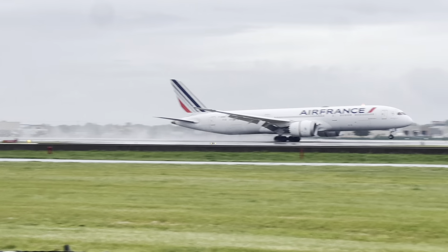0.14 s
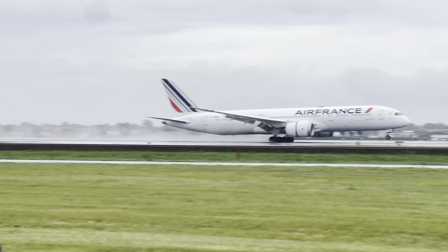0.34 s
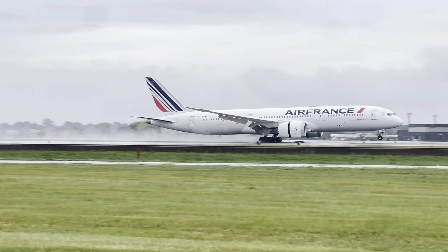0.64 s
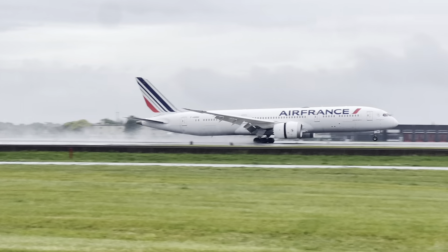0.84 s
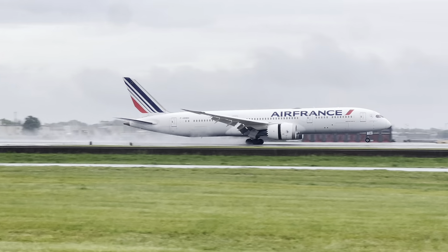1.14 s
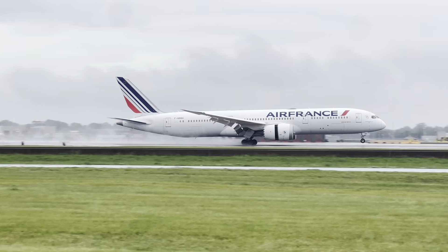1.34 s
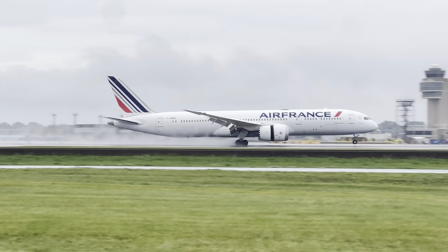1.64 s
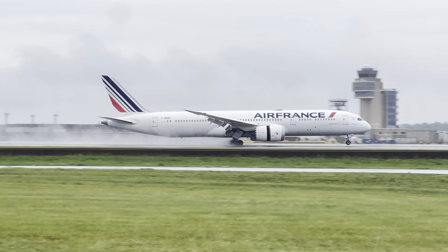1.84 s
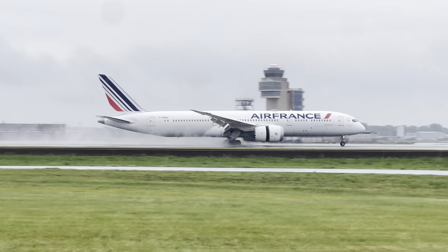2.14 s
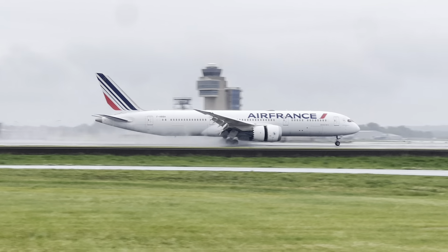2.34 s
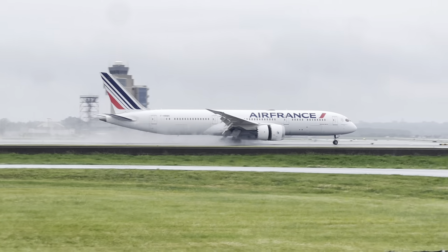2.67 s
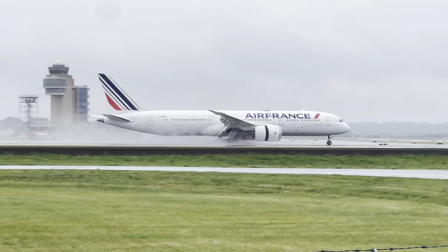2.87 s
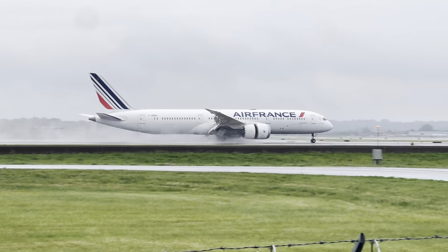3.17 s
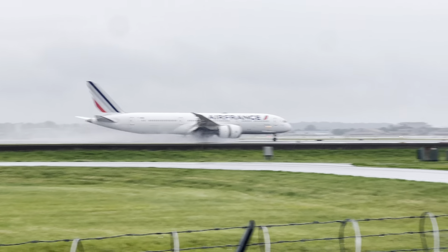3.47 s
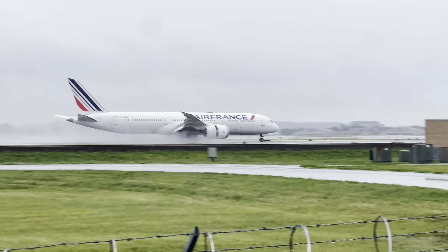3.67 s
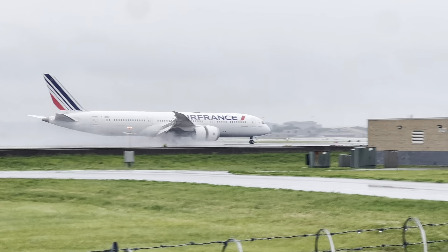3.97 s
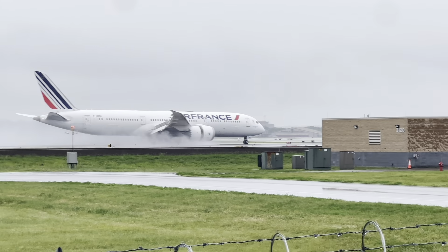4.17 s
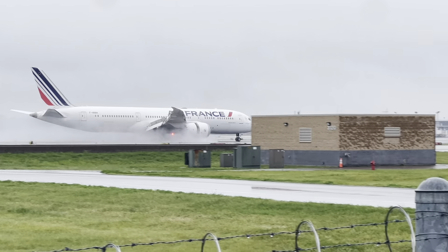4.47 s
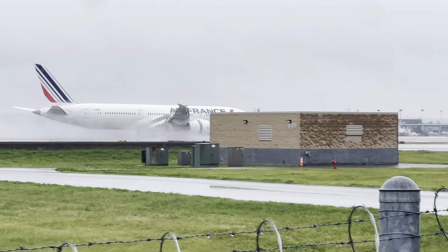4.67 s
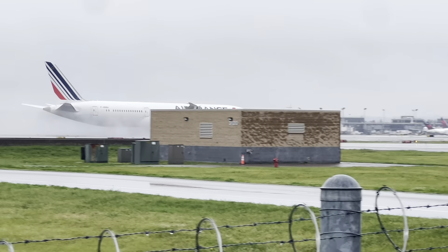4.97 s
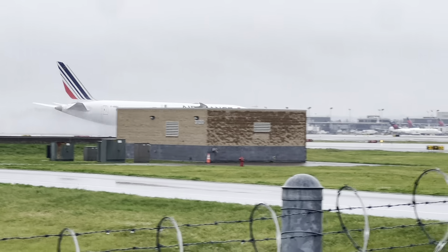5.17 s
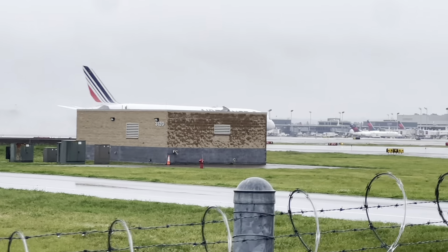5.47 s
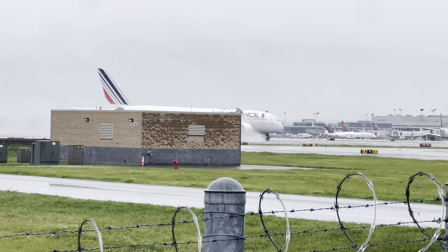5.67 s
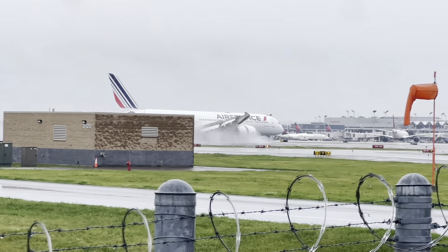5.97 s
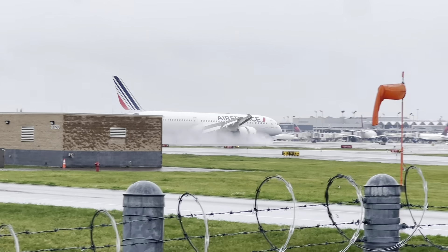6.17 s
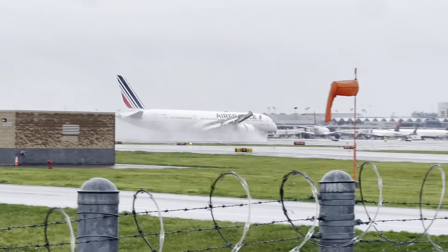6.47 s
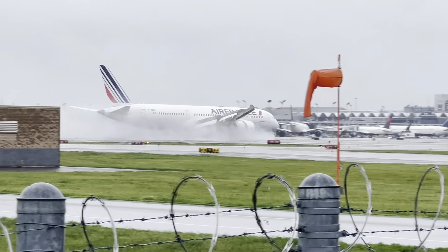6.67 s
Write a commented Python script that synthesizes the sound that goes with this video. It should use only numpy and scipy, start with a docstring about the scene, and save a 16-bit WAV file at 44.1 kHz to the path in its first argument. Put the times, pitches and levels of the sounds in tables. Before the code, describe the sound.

A large jet rolls past on a wet runway in reverse thrust, its deep rumble and gusty roar swelling to a broad hissing blast.

```python
"""A large jet rolls past on a wet runway in reverse thrust, heard from the airport fence.
From the start, shaped noise makes its rumble, its roar and a hiss of fine turbulence and spray in gusty wind.
Blurred engine whines swell and die early on, with a soft rustle and tiny ticks close by.
The blast grows as the jet comes abreast, while the echo off the grass cuts wandering dips in the sound.
A wavering fan tone comes through as the jet draws away, and last a shed briefly combs the rumble."""
import sys
import numpy as np
from scipy import signal
from scipy.io import wavfile
from scipy.ndimage import uniform_filter1d, minimum_filter1d

SR = 44100
rng = np.random.default_rng(int(sys.argv[2]) if len(sys.argv) > 2 else 0)


def pcm_store(signal):
    """Save signal as 16-bit PCM."""
    levels = np.round(np.clip(np.atleast_2d(signal), -1, 1) * 32767)
    wavfile.write(sys.argv[1], SR, levels.astype(np.int16).T)


N = 300762

FRAME, HOP = 2048, 256  # length and spacing of the noise frames, in samples
HZ = np.fft.rfftfreq(FRAME, 1 / SR)
TIMES = np.arange(N // HOP + 9) * HOP / SR  # time of each frame, in s
T = np.arange(N) / SR  # time of each sample, in s

# strength of the reversed fan air, which drives both roar and hiss: time_s, level_db
BLAST = [(0.03, -35), (0.44, -35), (0.99, -29.5), (1.76, -31), (2.13, -26.5), (2.72, -24), (2.95, -21),
         (3.3, -21.5), (3.9, -21), (4.5, -19.5), (5.0, -18.5), (5.45, -21.5), (5.95, -23.5), (6.8, -25)]
FULL_DB = -19  # the blast near full reverse thrust
# dips where direct sound and ground echo cancel: time_s, low_dip_hz, low_depth (ratio), high_dip_hz
GROUND_DIP = [(0, 385, 0.5, 1960), (0.6, 376, 1.1, 2140), (1.15, 422, 0.94, 2360), (1.8, 390, 0.96, 2320),
              (2.2, 375, 0.75, 2300), (2.85, 345, 0.45, 2170), (3.3, 366, 0.8, 2170),
              (3.85, 377, 1.8, 2060), (4.4, 374, 1, 2070), (5, 388, 1.1, 2050), (5.8, 412, 0.69, 1840),
              (6.8, 414, 1.3, 1480)]


def gain_of(db):
    """Turns decibels into a factor for the amplitude."""
    return 10 ** (np.asarray(db) / 20)


def evened(x):
    """Scales a signal to an rms of 1."""
    return x / np.sqrt(np.mean(x ** 2) + 1e-20)


def read(points):
    """Reads a spectrum table at every frequency bin, straight on a log-frequency axis."""
    hz, value = np.transpose(points)
    return np.interp(np.log(HZ + 1), np.log(hz + 1), value)


def follow(rows):
    """Reads each column of a time table at every frame."""
    s, *columns = np.transpose(rows)
    return [np.interp(TIMES, s, column)[:, None] for column in columns]


def octaves(centre_hz):
    """Gives the distance of every bin from a centre, in octaves."""
    return np.log2((HZ + 1) / centre_hz)


def bell(distance, spread):
    """A smooth hump: 1 at distance zero, about 0.37 at one spread to either side."""
    return np.exp(-(distance / spread) ** 2)


def moment(centre_s, spread_s):
    """A smooth hump over the frames: it swells and dies around one moment."""
    return bell(TIMES[:, None] - centre_s, spread_s)


def patches(seconds, width_hz):
    """Random noise smoothed over time and frequency, scaled to an rms of 1."""
    field = rng.standard_normal((len(TIMES), len(HZ)))
    for axis, steps in enumerate([seconds * SR / HOP, width_hz * FRAME / SR]):
        field = uniform_filter1d(field, max(1, round(steps)), axis, mode="wrap")
    return evened(field)


def turbulence(colour_db, level_db):
    """Stereo noise shaped frame by frame: what both sides share is mid, what differs is side."""
    # how wide the sound is: pitch_hz, side_minus_mid_db
    width_curve = [(60, -29.5), (130, -23.5), (250, -22), (400, -32.5), (630, -11), (830, -25.5),
                   (1100, -16.5), (1900, -27.5), (2700, -27.5), (3500, -35.5), (4300, -51), (6900, -54.5),
                   (7800, -14), (8600, 2.5), (11500, 5), (13000, -13.5)]
    # which side is louder: pitch_hz, left_minus_right_db
    lean_curve = [(60, -.1), (125, -.5), (300, -.8), (550, -2.2), (1000, -1.8), (1700, -.8), (2800, 0)]
    # which side is ahead in phase: pitch_hz, left_lead_radians
    lead_curve = [(60, 0), (250, -0.065), (520, -.2), (800, 0), (3000, 0)]
    a, b, c, d = rng.standard_normal((4, len(TIMES), len(HZ)))
    mid = a + 1j * b
    side = (c + 1j * d) * gain_of(read(width_curve))
    lean = gain_of(read(lean_curve) / 2) * np.exp(.5j * read(lead_curve))
    colour = gain_of(colour_db)
    colour /= np.linalg.norm(colour, axis=-1, keepdims=True)  # colour alone leaves the level unchanged
    frames = np.array([(mid + side) * lean, (mid - side) / lean]) * colour * gain_of(level_db)
    unit_rms = np.sqrt(3 * FRAME / HOP / 8)  # makes up for the overlap of the frames
    noise = signal.istft(frames.swapaxes(1, 2), nperseg=FRAME, noverlap=FRAME - HOP)[1]
    return unit_rms * noise[:, :N]


def narrow_noise(hz, width_hz):
    """A tone blurred by the moving air into a narrow band of noise around the curve hz."""
    offset_hz = np.fft.fftfreq(N, 1 / SR)
    blur_spectrum = np.fft.fft(rng.standard_normal(N)) / (1 + (2 * offset_hz / width_hz) ** 2)
    carrier = np.exp(2j * np.pi * np.cumsum(hz) / SR)
    return evened((np.fft.ifft(blur_spectrum) * carrier).real)


def air_floor():
    """A thin, steady floor of hiss."""
    # spectrum of the floor: pitch_hz, density_db_per_hz (relative)
    floor_spectrum = [(20, -4), (8000, -11.5), (11500, 25.5), (15500, 16)]
    return turbulence(read(floor_spectrum), level_db=-77.5)


def ground(low_db, high_db):
    """Echoes off the ground partly cancel the direct sound, around two wandering pitches."""
    low_hz, depth, high_hz = follow(GROUND_DIP)
    formed = np.minimum(TIMES[:, None] / 3.7, 1)  # the upper one takes 3.7 s to form
    low_dip_db = low_db * depth * bell(octaves(low_hz), 0.18)
    high_dip_db = high_db * formed * bell(octaves(high_hz), 0.25)
    return -low_dip_db - high_dip_db


def surges():
    """Brief rises and falls of the rumble in dB, each in its own part of the bass."""
    # surges of the rumble: crest_s, spread_s, centre_hz, lift_db
    surge_rows = [(0.163, 0.13, 90, 2.5), (1.12, 0.06, 100, -3), (2.1, 0.08, 59.6, 2.5),
                  (2.712, 0.052, 95, 2.5), (3.33, 0.11, 90, 2), (3.695, 0.08, 130, 4), (4.22, 0.2, 270, 3),
                  (4.642, 0.1, 105, 2.5), (6.05, 0.071, 105, 2.5), (6.358, 0.069, 136, 3),
                  (6.76, 0.067, 91, 2.5)]
    return sum(db * moment(s, spread_s) * bell(octaves(hz), 0.36) for s, spread_s, hz, db in surge_rows)


def rumble():
    """The largest eddies of the fan air make bass noise, deepest when the jet is abreast."""
    # level of the rumble before its surges and trim: time_s, level_db
    thrust_curve = [(0, -21.5), (0.55, -24), (0.97, -22), (1.08, -19.5), (2.35, -17), (3.05, -13),
                    (4.1, -15), (4.75, -13), (5.45, -15.5), (6.8, -15.5)]
    # spectrum of the rumble: pitch_hz, density_db_per_hz (relative)
    rumble_spectrum = [(20, -28), (35, -18), (48, -6), (62, 4.5), (80, -0.5), (100, -1), (150, -5.5),
                       (200, -7), (260, -10.5), (315, -13.5), (370, -22.5), (420, -18.5), (520, -47),
                       (900, -120)]
    # the deepest bass swells and sags: time_s, lift_db
    bass_curve = [(.15, 2), (.6, 4), (1.3, 5), (2.1, 1.5), (2.7, 0), (3.2, -4), (3.9, 0), (4.3, 2.5),
                  (5.0, -2), (5.4, -7), (6.15, 3.5), (6.5, -9), (6.8, -5)]
    level_db, = follow(thrust_curve)
    dip_hz = follow(GROUND_DIP)[0]
    abreast = moment(2.82, 1.19)
    tilt_db = 0.24 - 2.0 * abreast  # per octave
    # the ground echo lifts the rumble just under its dip, most when the jet is far
    shoulder_db = 3.5 * (1 - 0.6 * abreast) * bell(octaves(0.709 * dip_hz), 0.34)
    colour_db = read(rumble_spectrum) + tilt_db * octaves(110) + shoulder_db
    colour_db = colour_db + ground(low_db=7.5, high_db=1.0) + shed()
    swell_db = follow(bass_curve)[0] * bell(octaves(54), 0.32)
    noise = turbulence(colour_db, level_db + swell_db + surges() + 0.86)
    # the microphone passes little of the deepest bass
    bass_cut = signal.butter(2, 48, "high", fs=SR, output="sos")
    return signal.sosfilt(bass_cut, noise)


def gusts():
    """Gusts and lulls in the wind carry the sound better or worse; gives the lift in dB."""
    # gusts (lift above 0) and lulls (below 0): crest_s, spread_s, lift_db
    gust_rows = [(0.073, 0.035, -3.5), (0.18, 0.028, 5), (0.42, 0.09, -0.5), (0.68, 0.035, 1.5),
                 (0.794, 0.049, -2.5), (1.1, 0.045, 2.5), (1.4, 0.2, 0), (1.86, 0.08, -1.3), (2.15, .1, 3),
                 (2.56, 0.19, 3.5), (2.774, 0.041, -2), (3.27, 0.098, 4.5), (3.646, 0.3, 2.1),
                 (4.65, 0.071, 1), (5.5, 0.17, 1), (6.03, 0.07, -0.5), (6.237, 0.1, 2.5), (6.5, 0.17, 2.5)]
    return sum(db * moment(s, spread_s) for s, spread_s, db in gust_rows)


def roar():
    """Middle-sized eddies from the reversers: brighter as the blast grows, a little patchy over the field."""
    # spectrum of the roar: pitch_hz, density_db_per_hz (relative)
    roar_spectrum = [(220, -31.5), (380, -0.5), (470, -1), (600, -0.5), (690, -2), (780, -5), (940, -0.9),
                     (1140, -0.1), (1250, -1.5), (1350, -2.5), (1500, -0.5), (1820, -5), (2250, -8.5),
                     (2900, -30), (5000, -120)]
    # lift of the low part of the roar: time_s, lift_db
    low_curve = [(0, 2), (0.8, 1.5), (1.4, 1.5), (2.0, 0), (2.9, -0.5), (3.65, -1.5), (4.3, -0.8),
                 (4.9, 0.9), (5.6, -1.5), (6.8, 1.5)]
    blast_db, = follow(BLAST)
    tilt_db = 0.84 + 0.19 * (blast_db - FULL_DB)  # per octave
    colour_db = read(roar_spectrum) + tilt_db * octaves(900) + ground(low_db=9.0, high_db=4)
    # the body fills out while the exhausts turn toward the fence
    body_db = 2.1 * moment(4.7, 0.62) * bell(octaves(1040), 0.22)
    low_db = follow(low_curve)[0] * bell(octaves(560), 0.6)
    patchy_db = 0.71 * patches(seconds=0.17, width_hz=200) + 0.6 * patches(seconds=.08, width_hz=3900)
    # the wind moves the roar less than the hiss
    return turbulence(colour_db, blast_db + 0.4 * gusts() + body_db + low_db + patchy_db)


def hiss():
    """Fine turbulence and spray: it grows faster than the blast, brightens in gusts, and flickers."""
    # spectrum of the hiss: pitch_hz, density_db_per_hz (relative)
    hiss_spectrum = [(1210, -30.5), (2050, -3), (2270, -3.5), (2550, 3), (2800, 0.3), (3250, 0.5),
                     (4500, -8), (5100, -8), (5800, -14), (7000, -19), (7600, -21.5), (8530, -29.5),
                     (9200, -42.5), (12000, -95), (20200, -120)]
    blast_db, = follow(BLAST)
    carried_db = 1.32 * (blast_db - FULL_DB) + gusts()
    tilt_db = 0.034 * carried_db + .55  # per octave
    # from 3.5 s on the air takes more and more treble as the jet rolls away
    absorbed_db = 0.89 * np.maximum(TIMES[:, None] - 3.5, 0) * (HZ / 8000) ** 2
    colour_db = read(hiss_spectrum) + tilt_db * octaves(3200) - absorbed_db
    colour_db = colour_db + ground(low_db=-1, high_db=2.5)
    # the ground echo ripples the treble too, with a slight dip at each multiple of the high one
    ripple = np.cos(2 * np.pi * HZ / follow(GROUND_DIP)[2])
    colour_db -= 0.1 * ripple * np.clip(octaves(2500), 0, 1)
    colour_db += 0.85 * patches(seconds=0.23, width_hz=1400)
    flicker_db = 0.67 * patches(seconds=.04, width_hz=6400)
    return turbulence(colour_db, FULL_DB - 5 + carried_db + flicker_db)


def whines():
    """Blurred engine whines that swell, glide in pitch and vanish before the jet comes abreast."""
    # whines while the intakes still face this way, with the level at the crest of each:
    # start_s, end_s, start_hz, end_hz, width_hz, level_db
    whine_rows = [(-0.62, 1.343, 310, 268, 80, -31.5), (0.089, 1.6, 540, 525, 180, -35.5),
                  (0.04, 0.287, 1300, 1380, 180, -39), (-.3, 0.27, 5200, 8900, 40, -74),
                  (0.79, 1.6, 6250, 6050, 350, -71)]
    out = np.zeros(N)
    for start, end, from_hz, to_hz, width_hz, db in whine_rows:
        progress = np.clip((T - start) / (end - start), 0, 1)
        hz = from_hz + (to_hz - from_hz) * progress
        out += gain_of(db) * np.sin(np.pi * progress) * narrow_noise(hz, width_hz)
    return out


def rustle():
    """One brief, soft brush of treble noise close to the microphone, which flutters as it passes."""
    # spectrum of the rustle: pitch_hz, density_db_per_hz (relative)
    rustle_spectrum = [(2500, -16), (5000, 0), (7500, 1), (8800, -1), (10500, -31), (15500, -25)]
    flutter_db = 1.5 * patches(seconds=.03, width_hz=6000)
    return bell(T - 0.25, .11) * turbulence(read(rustle_spectrum), -58 + flutter_db)


def ticks():
    """Tiny treble crackles near by: a quick snap in a cluster of uneven grains; fainter ones fall at random."""
    # the clearer ticks, with levels before a shared trim: time_s, level_db
    tick_rows = [(0.2349, -51), (0.2818, -58), (0.3194, -53), (0.6344, -52), (0.7775, -58), (1.303, -59),
                 (1.6272, -45), (1.6706, -49), (1.695, -53), (1.7344, -51), (3.5309, -40), (3.5743, -46),
                 (3.5952, -47), (3.632, -54), (5.05, -54), (5.72, -57), (6.535, -61)]
    faint_count = round(4 * N / SR)  # 4 per second
    faint = [(when * N / SR, -67) for when in rng.random(faint_count)]
    level = np.zeros(N)
    for s, db in list(tick_rows) + faint:
        near = abs(T - s) < .25
        age = T[near] - s
        snap = np.exp(-abs(age - .0015) / 0.0018)
        cluster = 0.13 * np.exp(-abs(age - .01) / 0.022)
        level[near] += gain_of(db - 10.5) * (snap + cluster)
    falls = rng.random(N) < 4000 / SR  # about 4000 grains per second
    uneven = gain_of(3 * np.minimum(rng.exponential(1, N), 3))
    grains = rng.standard_normal(N) * falls * uneven
    treble_only = signal.butter(3, 10500, "high", fs=SR, output="sos")
    return level * evened(signal.sosfilt(treble_only, grains))


def fan():
    """The fan blade tone from behind the engines: a wavering line in a faint skirt, and a blurred octave."""
    # level of the tone before its parts are mixed: time_s, level_db
    fan_curve = [(4.3, -46), (4.65, -34), (5.4, -33), (6.0, -34.5), (6.8, -35.5)]
    s, db = np.transpose(fan_curve)
    fade_in = np.clip(T - s[0] + 1, 0, 1)  # over the second before the first point
    level = gain_of(np.interp(T, s, db)) * fade_in
    hz = np.full(N, 537)
    waver = evened(uniform_filter1d(rng.standard_normal(len(TIMES)), size=25))
    line_hz = hz + 2.084 * np.interp(T, TIMES, waver)
    line = np.sqrt(2) * np.sin(2 * np.pi * np.cumsum(line_hz) / SR)
    skirt = narrow_noise(hz, width_hz=30)
    octave = gain_of(-10.5) * narrow_noise(2 * hz, width_hz=40)
    octave += gain_of(-3.0) * narrow_noise(2 * hz, width_hz=370)
    return level * (gain_of(-1.5) * line + gain_of(-5) * skirt + octave)


def shed():
    """A second path around a brick shed combs the rumble; the notch climbs as the detour shortens."""
    centre_s = 6.07
    notch_hz = 201 * 2 ** (1.9 * (TIMES[:, None] - centre_s))  # climbs 1.9 octaves per second
    comb = np.cos(np.pi * HZ / notch_hz) * bell(octaves(1.17 * notch_hz), 0.82)
    return 4.5 * moment(centre_s, 0.45) * comb  # in dB


def scene():
    """The blast of the jet, its tones slightly to the right, and the faint sounds near by."""
    tones = (whines() + fan()) * gain_of([[-1.1], [1.1]])  # left, right
    return air_floor() + rumble() + roar() + hiss() + tones + rustle() + ticks()


def record(dry):
    """Smoothly turns down any peak above 0.92, then cuts what lies above 15750 Hz."""
    headroom = np.minimum(1, .92 / (abs(dry).max(0) + 1e-9))
    lowest = minimum_filter1d(headroom, size=401)
    smooth_gain = uniform_filter1d(uniform_filter1d(lowest, size=201), size=201)
    low_pass = signal.firwin(401, 15750, window=("kaiser", 9), fs=SR)
    return signal.oaconvolve(dry * smooth_gain, low_pass[None], "same")


dry = scene()
out = record(dry)
pcm_store(out)
```